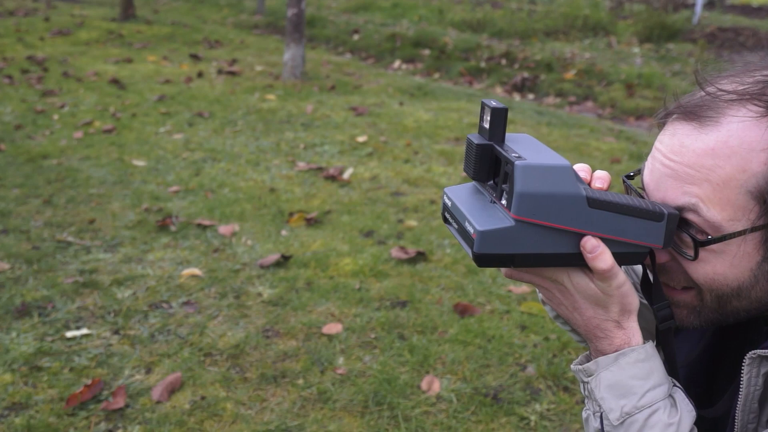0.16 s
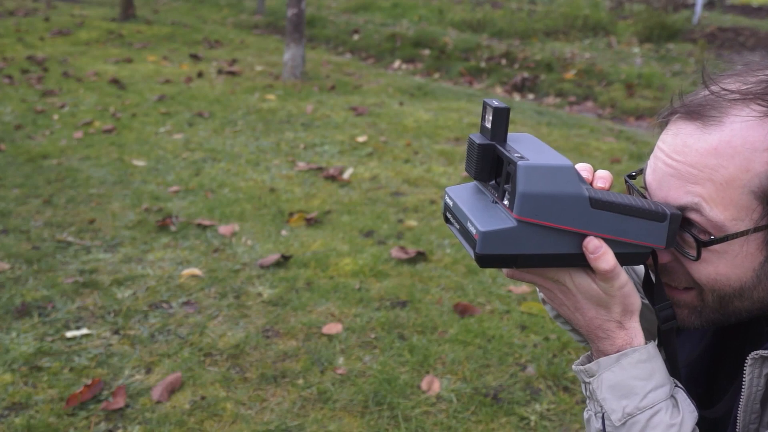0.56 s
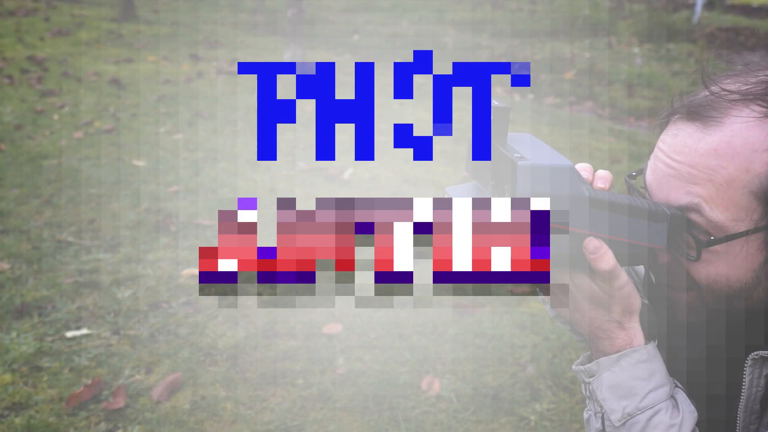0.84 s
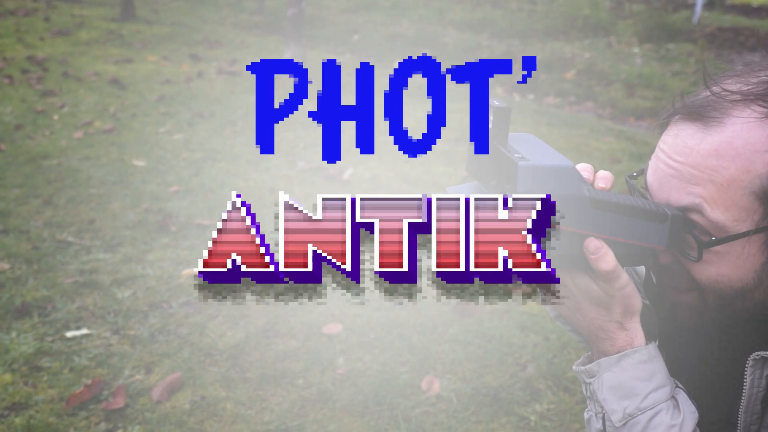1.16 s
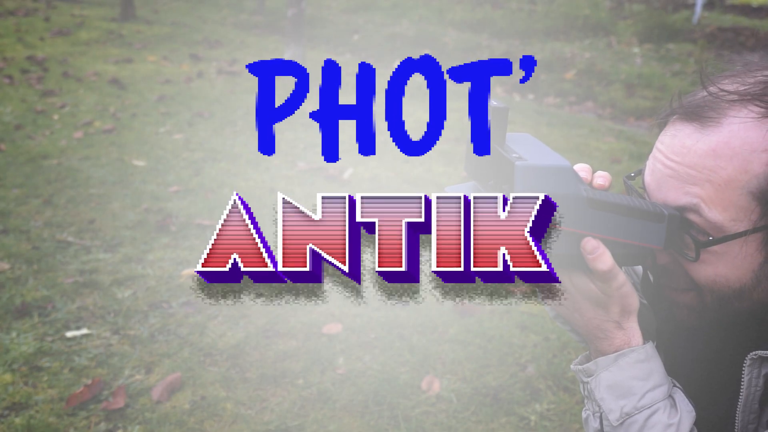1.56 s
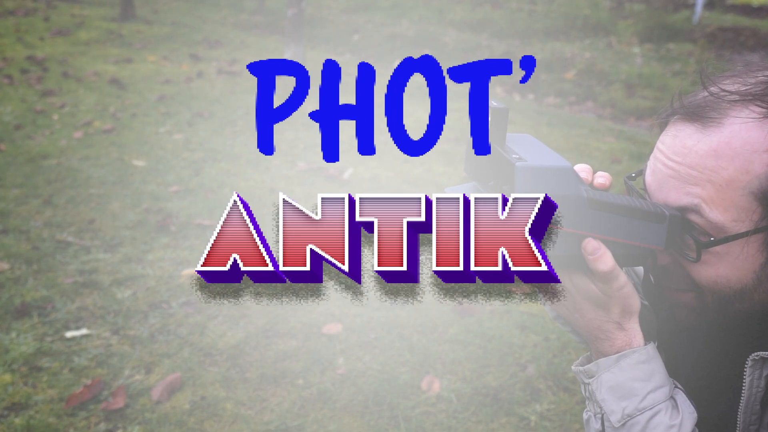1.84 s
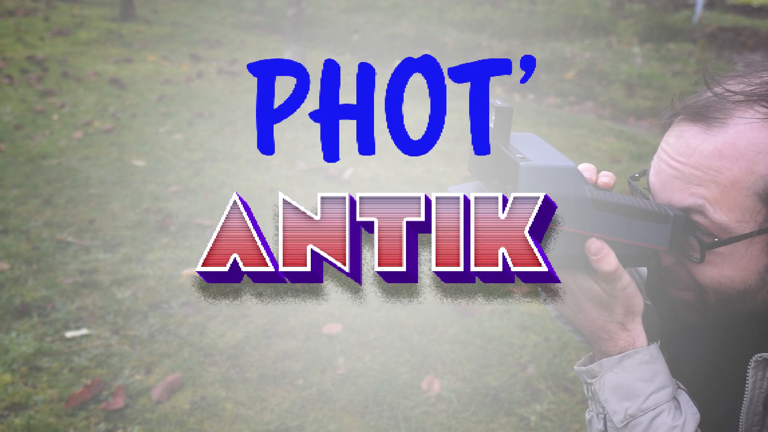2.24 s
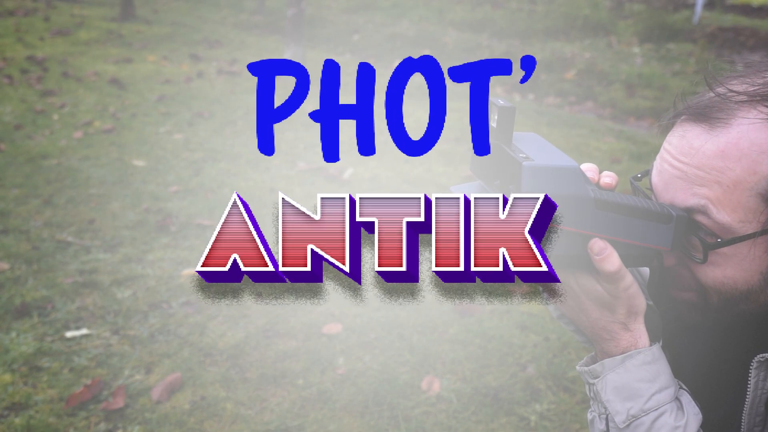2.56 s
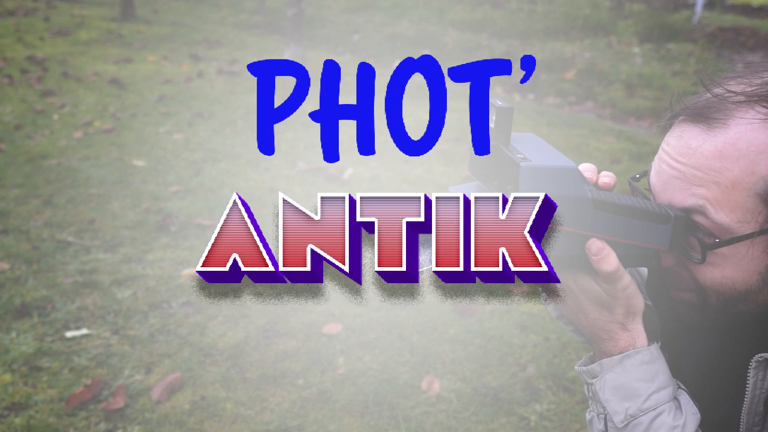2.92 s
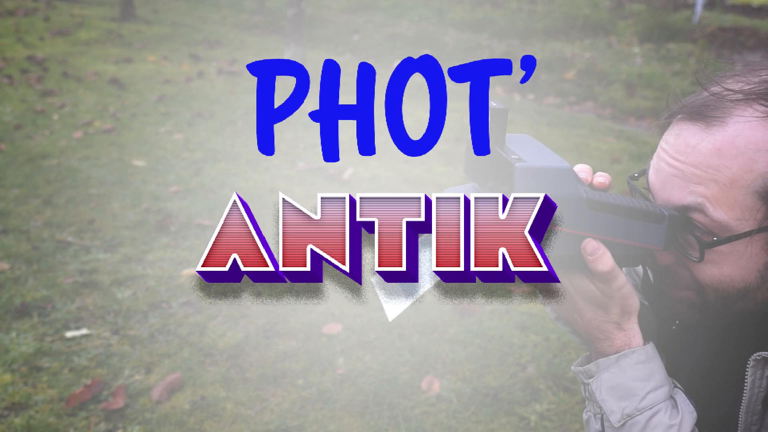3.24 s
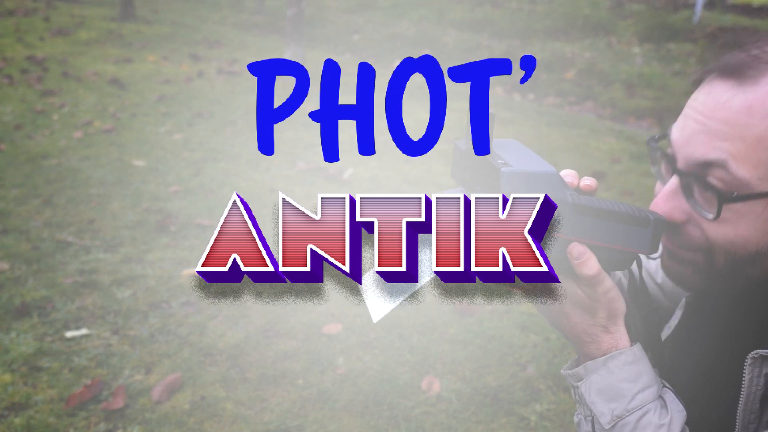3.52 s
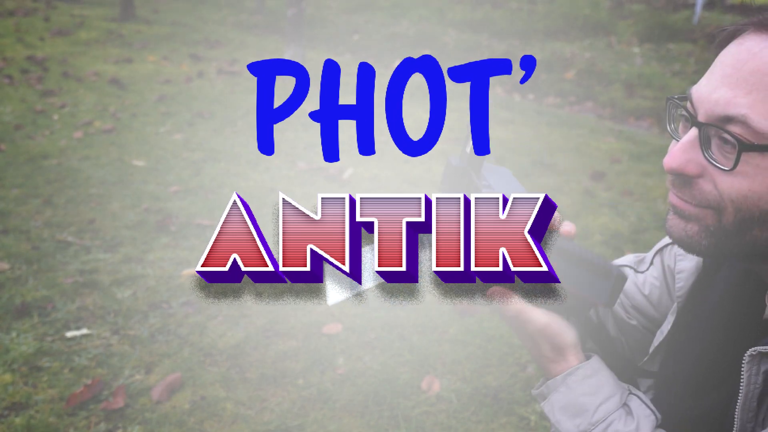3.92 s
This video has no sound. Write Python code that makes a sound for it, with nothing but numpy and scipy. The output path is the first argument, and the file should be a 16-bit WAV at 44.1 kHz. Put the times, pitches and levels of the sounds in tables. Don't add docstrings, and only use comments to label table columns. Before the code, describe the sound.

Outdoors on grass, far from a busy road, low traffic rumble. At one second an instant camera close to the microphone fires: two crisp clusters of plastic clicks. A small geared motor spins up and hums with a rattling shell, then drops in pitch and grinds louder as rollers grip the print, climbing slowly with a thin whine. Hard clicks release it, it runs lighter briefly, then a last latch and quick coast-down.

```python
import sys
import numpy as np
from scipy import signal
from scipy.fft import rfft, irfft
from scipy.io import wavfile
from scipy.ndimage import uniform_filter1d

SR = 44100
rng = np.random.default_rng(int(sys.argv[2]) if len(sys.argv) > 2 else 0)


def volts(x):
    e = np.asarray(x, float) / 20
    return 10 ** e


def transcribe(signal):
    frames = np.atleast_2d(signal).T
    limited = np.clip(frames, -1, 1)
    pcm = np.round(limited * 32767).astype(np.int16)
    wavfile.write(sys.argv[1], SR, pcm)


N = 180192
TIME = np.arange(N) / SR


def evened(x):
    return x / np.sqrt(np.mean(x ** 2) + 1e-20)


def read(points, hz):
    f, value = np.transpose(points)
    return np.interp(np.log(hz + 1), np.log(f + 1), value)


def peaks_db(modes, hz, valley_db):
    peaks = sum(volts(2 * db) / (1 + (2 * (hz - f) / width) ** 2) for f, width, db in modes)
    return 10 * np.log10(peaks + volts(2 * valley_db))


def filtered(x, gain):
    return irfft(rfft(x) * gain(np.fft.rfftfreq(N, 1 / SR)), N)


def resonate(x, hz, width):
    turn = np.exp(2j * np.pi * hz * np.arange(len(x)) / SR)
    r = np.exp(-np.pi * width / SR)
    return 2 * (turn * signal.lfilter([1 - r], [1, -r], x / turn)).real


def noise(shape_db, patchy_db, size):
    frames, hz = 4 * N // size + 5, np.fft.rfftfreq(size, 1 / SR)
    real, imag, patches = rng.standard_normal((frames, len(hz), 3)).T
    patches = uniform_filter1d(patches, size=8, axis=0)
    patches = evened(uniform_filter1d(patches, size=10, axis=1))
    field_db = shape_db(hz[:, None], np.arange(frames) * size / 4 / SR)
    field_db = field_db - 10 * np.log10(np.mean(volts(2 * field_db), axis=0))
    z = (real + 1j * imag) * volts(field_db + patchy_db * patches)
    return evened(signal.istft(z, nperseg=size, noverlap=size * 3 // 4)[1][:N])


def wander(hz, count):
    steps = rng.standard_normal((N // 64 + 2, count))
    smooth = signal.sosfiltfilt(signal.butter(2, hz, fs=SR / 64, output="sos"), steps, axis=0)
    return [np.interp(TIME, np.arange(len(c)) * 64 / SR, evened(c)) for c in smooth.T]


def traffic():
    # (f/Hz, level/dB per Hz)
    roar = [(12, -40), (27, -10), (41, -8), (65, -6), (95, -7), (150, -7.5), (228, -13.5), (399, -15.5),
            (678, -18.5), (1060, -17.5), (1760, -25), (3630, -28.5), (5080, -27), (8410, -33),
            (15700, -36.5)]
    # (f/Hz, width/Hz, level/dB over the roar)
    engines = [(52.6, 8.4, 8), (118.4, 5.5, 7.5)]
    # (t/s, level/dB, extra hiss/dB)
    course = [
        (.057, -30.5, -2.5),
        (.96, -32, 1),
        (1.0, -36.5, -7),
        (1.1, -40, 10.5),
        (3.25, -36, 8),
        (3.3, -39.5, 21),
        (3.52, -47, 2),
        (4.09, -46, 7.5),
    ]
    s, level_db, hiss_db = np.transpose(course)

    def shape_db(hz, t):
        hiss = np.interp(t, s, hiss_db) * hz / (hz + 3000)
        return read(roar, hz) + peaks_db(engines, hz, 0) + hiss
    return volts(np.interp(TIME, s, level_db)) * noise(shape_db, 1.1, size=4096)


def snaps():
    # (t/s, peak level/dB, ring f/Hz)
    crisp = [(1.0057, 1, 7900), (1.0095, -1.5, 5000), (1.0828, -7.5, 7400), (1.1261, -5, 7700),
             (1.1305, 1, 7760), (1.1395, 3, 6000), (1.227, -17.5, 2120), (1.3234, -18, 1730),
             (2.9027, -0.5, 5760), (3.5292, -4.5, 3300), (3.273, -1, 2000)]
    catches = [(1.0125, -8.5, 2500), (1.0805, -16, 7400), (1.0977, -16, 9600), (1.1036, -12.5, 9500),
               (1.1672, -13.5, 5700), (3.327, -13, 1660), (3.331, -10.5, 9200), (3.5269, -5.5, 6250),
               (3.5585, -19, 5630)]
    levers = [
        (.999, -32, 1100),
        (1.1157, -15.5, 2150),
    ]
    rollers = [(2.105, -8, 10200), (2.1525, -11, 11800), (2.4094, -15, 8770), (2.797, -4, 5970),
               (3.1785, 2, 9300), (3.1793, -4, 6100), (3.2574, 4, 6740), (3.258, 2, 10800),
               (3.2675, -0.5, 10000), (3.2704, 2, 11100), (3.321, -6, 10400)]
    grip = [
        (2.1306, -9.5, 11370),
    ]
    # (relative knock level/dB, t60/s, ring share/0-1)
    parts = [
        (-17, 0.026, 0.16),
        (-10.5, 0.029, 0.29),
        (-8, .025, 0.9),
        (-41, 0.013, 0.76),
        (-8, 0.096, 1),
    ]
    # (f/Hz, level/dB per Hz)
    crackle_colour = [(590, -35), (1000, -7.5), (1870, -4.5), (3750, -8.5), (4680, -2.5), (5310, -3.5),
                      (7530, -2.5), (11000, -4.5), (12500, -13.5), (16200, -43), (22000, -120)][:-2]
    # (f/Hz, width/Hz, level/dB)
    hollow = [(488, 140, 3.5), (774, 66, 8), (1180, 146, -3)]
    out, t = np.zeros(N), np.arange(4096) / SR
    hz = np.fft.rfftfreq(len(t), 1 / SR)
    rise = 1 - np.exp(-t / 0.0005)
    for table, (knock_db, t60_s, share) in zip((crisp, catches, levers, rollers, grip), parts):
        decay = 0.38 * np.exp(-t / 0.001) + 0.78 * volts(-60 * t / t60_s) + volts(-28 - 60 * t / 0.1)
        for s, peak_db, ring_hz in table:
            burst = rng.standard_normal(len(t))
            crackle = evened(irfft(rfft(burst) * volts(read(crackle_colour, hz))))
            ring = evened(resonate(burst, ring_hz, 330))
            blow = burst * np.exp(-t / 0.0031)
            knock = sum(volts(db) * resonate(blow, f, width) for f, width, db in hollow)
            sound = 0.45 * ((1 - share) * crackle + share * ring) * rise * decay
            sound += volts(knock_db) * knock / abs(knock).max()
            out[round(s * SR):][:len(t)] += volts(peak_db) * sound
    return out


def shaft_speed():
    # (t/s, shaft speed/turns per s)
    settled = [(1.147, 199), (1.703, 198.5), (1.85, 192), (2.128, 186), (2.129, 78), (2.24, 89),
               (2.36, 104), (2.457, 111.4), (2.67, 115.5), (3.057, 128.1), (3.21, 137.6), (3.31, 132),
               (3.311, 191), (3.53, 189), (3.56, 110)]
    inertia_s = 0.053
    keep = np.exp(-1 / (inertia_s * SR))
    return signal.lfilter([1 - keep], [1, -keep], np.interp(TIME, *np.transpose(settled), left=0))


def gear_hum(speed, turns, grip):
    orders = [3, 4, 5, 6, 8, 9, 10, 11, 12, 13, 17, 25, 29, 33, 40, 3.8, 4.34, 5.74, 11.26, 13.74, 22.46]
    free_db = [-5.5, -1.5, -7, -3.5, -7, 0, -9, -11.5, -9, -24, -16, -8, -9, -26, -42, -47, -46, -35, -21,
               -30, -43]
    loaded_db = [-17, -20, -9, -12, -8, -22, -17, -7.5, -5, -11, -1.5, -27, -32, -40, -32, -12.5, -6, -4,
                 -10, -9, -10]
    # (f/Hz, width/Hz, level/dB)
    frame_modes = [(384, 33, -7), (538, 86, 0), (799.5, 22, 3.5), (998, 22, -2), (1090, 60, -4.5),
                   (1733, 120, 0), (2140, 78, 0.5), (2500, 240, -1), (2800, 92, 0), (5340, 2600, -4)]
    grid_hz = np.arange(0, SR / 2, 10)
    frame_db = peaks_db(frame_modes, grid_hz, -17.0) + 2
    drifts, shakes = wander(15.4, count=len(orders)), wander(85, count=len(orders))
    hum = np.zeros(N)
    for k, free, loaded, drift, shake in zip(orders, free_db, loaded_db, drifts, shakes):
        level = (1 - grip) * volts(free) + grip * volts(loaded)
        level = level * volts(np.interp(k * speed, grid_hz, frame_db))
        level = level * volts((1.2 + 1.9 * grip) * drift)
        slip_turns = (0.005 + 0.015 * grip + 0.0008 * k * (1 + 2 * grip)) * shake
        hum += level * np.sin(2 * np.pi * (k * turns + slip_turns + rng.random()))
    return hum


def shell_rattle(turns, load_at):
    # (f/Hz, level/dB per Hz)
    free_tilt = [(150, -50), (250, -53), (497, -36.0), (586, 4), (713, -28), (786, 5.0), (896, -11),
                 (1750, -3.5), (3010, -14.5), (3370, -11.0), (4170, -19.0), (12500, -18), (16200, -41),
                 (22000, -120)][:-2]
    loaded_tilt = [(150, -15), (250, -2), (402, -32), (497, -0.5), (1390, -9), (1640, 2), (2430, -13.0),
                   (3660, 3.5), (4110, -9.0), (4760, 2.0), (5510, -3), (12500, -3), (16200, -20),
                   (22000, -120)][:-2]
    # (f/Hz, width/Hz, level/dB)
    free_casing = [(1760, 81, -6), (3430, 130, -6), (5000, 250, -0.5), (5820, 70, 3), (6840, 290, 4.5),
                   (8100, 1240, 2), (10130, 170, 5.5), (11400, 370, -7)]
    loaded_casing = [(563, 17, -17), (1630, 72, -3.5), (2150, 20, 2), (2786, 34, 13.5), (3770, 360, -2.5),
                     (4710, 250, -6), (5800, 90, 0.5), (6480, 53, 7), (7350, 100, 1.5), (8060, 33, -2.5),
                     (9860, 200, 2), (10000, 330, -13.5), (11800, 870, 3), (11930, 600, -16)]

    def shape_db(hz, t):
        share = load_at(t)
        free = read(free_tilt, hz) + peaks_db(free_casing, hz, -11.0)
        loaded = read(loaded_tilt, hz) + 0.97 * peaks_db(loaded_casing, hz, -8.5)
        return (1 - share) * free + share * loaded
    throb = 1 + 0.079 * np.cos(2 * np.pi * turns)
    teeth_db = 0.95 * wander(154, count=1)[0] + 0.85 * wander(9.1, count=1)[0]
    return evened(noise(shape_db, 0.48, size=512) * throb * volts(teeth_db))


def motor():
    # (t/s, rattle level/dB, load/0-1)
    drive_course = [(1.199, -33, 0), (1.27, -31.5, 0.2), (1.4, -31.5, 0.29), (2.12, -23.5, .38),
                    (2.135, -18.5, 0.9), (2.17, -22.5, 0.78), (2.25, -25.5, 0.48), (2.7, -21.5, .8),
                    (3.25, -19, 0.73), (3.257, -31, .9), (3.285, -26.5, 1), (3.32, -32.5, 0.57),
                    (3.35, -32.5, 0.03), (3.52, -31, 0.38), (3.545, -38.5, 0), (3.62, -40, 0),
                    (3.68, -51.5, 0)]
    s, rattle_db, load = np.transpose(drive_course)
    spin_up_end_s, coast_s, off_s = 1.5, 3.257, 3.53
    start_db_per_s, stop_db_per_s = 422, 230

    def load_at(t):
        return np.interp(t, s, load)
    speed = shaft_speed() * (1 + 0.0015 * wander(49.0, count=1)[0])
    turns, grip = np.cumsum(speed) / SR, load_at(TIME)
    effort_db = np.interp(TIME, s, rattle_db)
    hum_db = -32.5 + 0.094 * (effort_db + 31)
    hum_db = hum_db + 0.3551 * grip * np.minimum(speed - 122, 0)
    hum_db = hum_db + 0.3 * np.minimum(speed - 195, 0) * (TIME < spin_up_end_s)
    coast_db = effort_db - 8 - 10 * (TIME > off_s)
    hum_db = np.where(TIME < coast_s, hum_db, coast_db)
    ends_db = -start_db_per_s * np.maximum(s[0] - TIME, 0) - stop_db_per_s * np.maximum(TIME - s[-1], 0)
    rattle = volts(effort_db) * shell_rattle(turns, load_at)
    return volts(ends_db) * (rattle + volts(hum_db) * gear_hum(speed, turns, grip))


def whine():
    multiples = [20, 60, 80, 100]
    # (f/Hz, width/Hz, level/dB)
    plate_modes = [(1920, 200, -38), (2280, 150, -42), (2720, 300, -37), (6500, 450, -33.5),
                   (7150, 450, -31), (7620, 200, -33), (9720, 280, -30), (10900, 400, -37),
                   (11680, 380, -30)]
    start_s, end_s, edge_s = 2.15, 3.25, 0.03
    stall_db_per_turn = 0.009
    speed, grid_hz = shaft_speed(), np.arange(0, SR / 2, 10)
    plate_db = peaks_db(plate_modes, grid_hz, -54)
    turns = np.cumsum(speed * (1 + 0.003 * wander(30, count=1)[0])) / SR
    out = np.zeros(N)
    for k, drift, shake in zip(multiples, wander(22, count=4), wander(190, count=4)):
        level_db = np.interp(k * speed, grid_hz, plate_db) + 3 * drift
        level_db = level_db + stall_db_per_turn * k * np.minimum(speed - 112, 0)
        out += np.sqrt(2) * volts(level_db) * np.sin(2 * np.pi * (k * turns + 0.0017 * k * shake))
    return out * np.clip(np.minimum(TIME - start_s, end_s - TIME) / edge_s, 0, 1)


def scene():
    # (f/Hz, level/dB)
    top_shelf = [(12300, 0.5), (13200, 0), (13700, -6), (14100, -21), (14800, -11), (15700, -8)]

    def latch_gain(hz):
        low_cut = 1 + (370 / (hz + 1)) ** 6
        return volts(0.5 * read(top_shelf, hz)) / low_cut
    latches = filtered(snaps(), latch_gain)
    drive = filtered(motor() + whine(), lambda hz: volts(read(top_shelf, hz)))
    return np.tile(latches + drive + traffic(), (2, 1))


def top_cut(x):
    return signal.sosfilt(signal.butter(12, 16950, fs=SR, output="sos"), x)


def record(dry):
    # (from t/s, to t/s)
    wide_spells = [
        (.057, .135),
        (.21, .255),
        (.675, .72),
        (1.835, 1.88),
        (2.625, 2.67),
        (3.81, 3.855),
    ]
    start_s, ceiling, edge_hz = 0.0568, 0.94, 15800
    started = TIME > start_s
    limited = dry[0] / (1 + (dry[0] / ceiling) ** 6) ** (1 / 6) * started
    mid = filtered(limited, lambda hz: np.clip((edge_hz - hz) / 150, 0.003, 1))
    treble = filtered(mid, lambda hz: hz > 5000)
    treble_rms = np.sqrt(abs(uniform_filter1d(treble ** 2, size=1024)))
    spell = uniform_filter1d(sum(1. * ((TIME > a) & (TIME < b)) for a, b in wide_spells), size=600)
    fill = evened(filtered(rng.standard_normal(N), lambda hz: (hz > 4800) & (hz < 12500)))
    side = volts(-13.5) * spell * fill * treble_rms * started
    return top_cut(np.array([mid + side, mid - side]))


dry = scene()
out = record(dry)
transcribe(out)
```